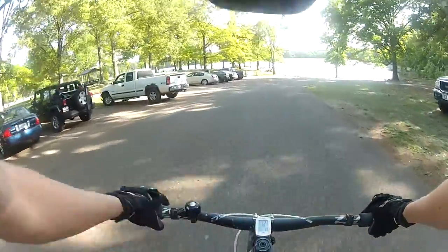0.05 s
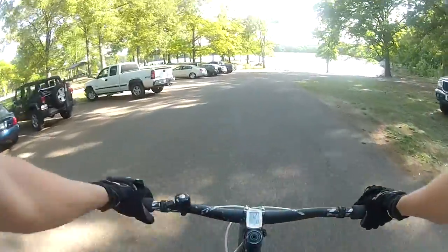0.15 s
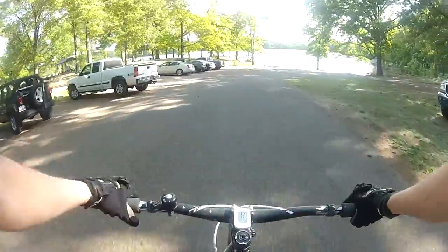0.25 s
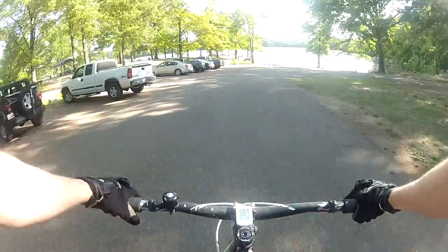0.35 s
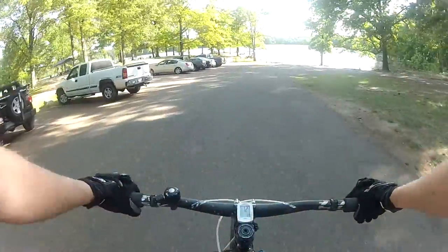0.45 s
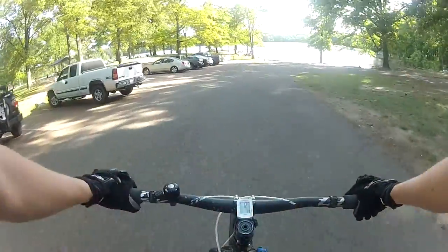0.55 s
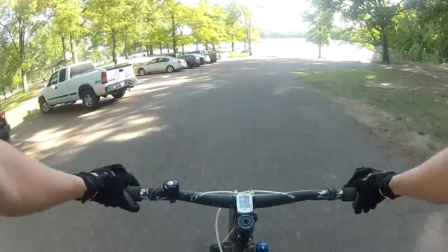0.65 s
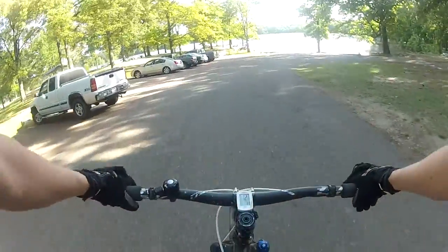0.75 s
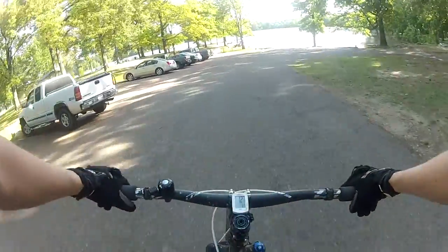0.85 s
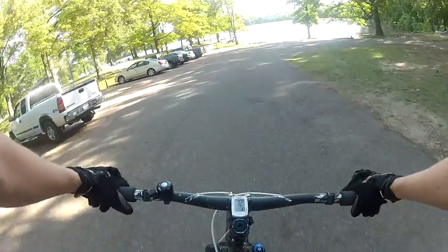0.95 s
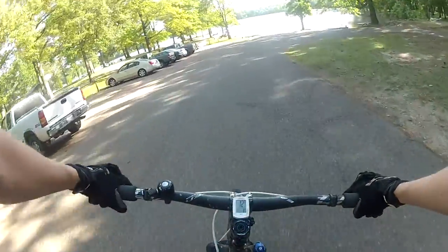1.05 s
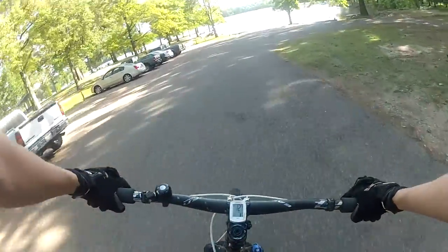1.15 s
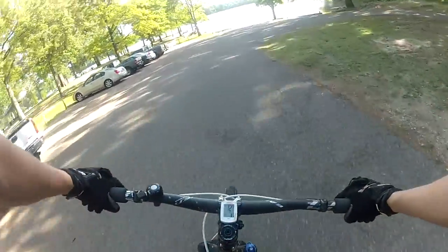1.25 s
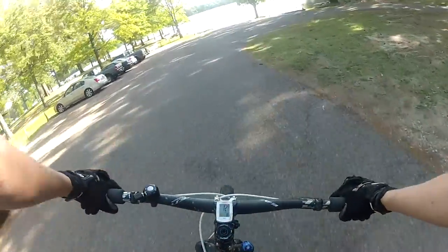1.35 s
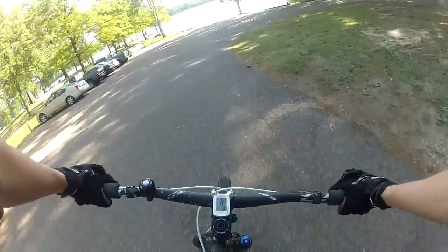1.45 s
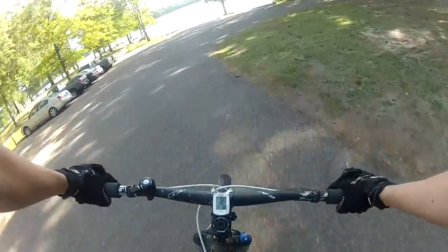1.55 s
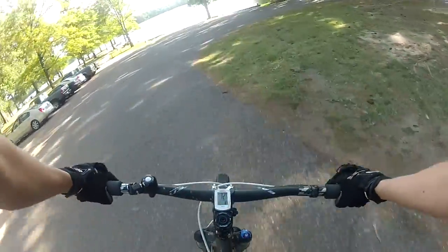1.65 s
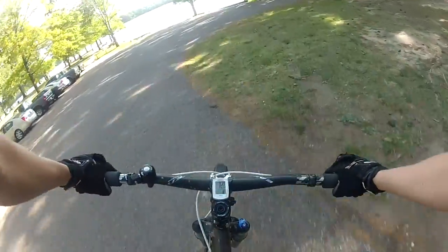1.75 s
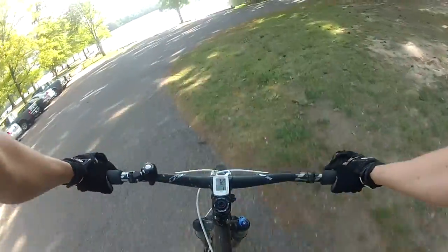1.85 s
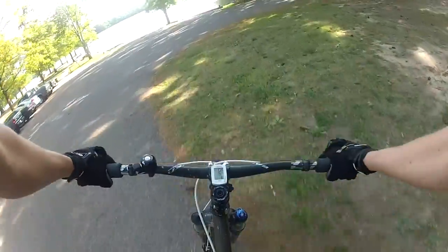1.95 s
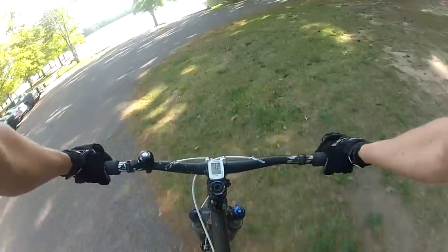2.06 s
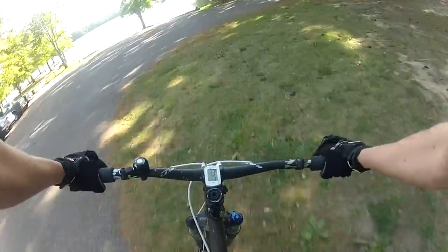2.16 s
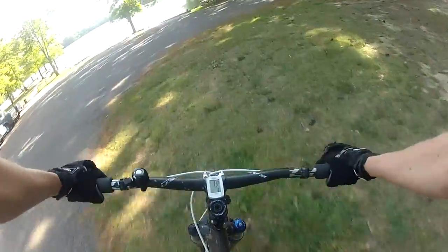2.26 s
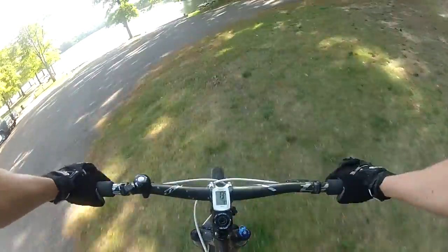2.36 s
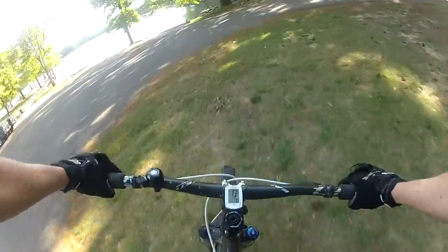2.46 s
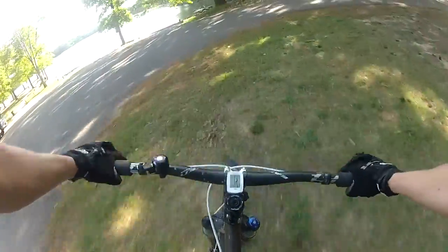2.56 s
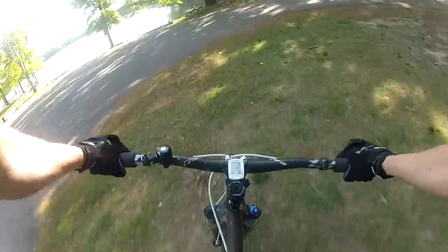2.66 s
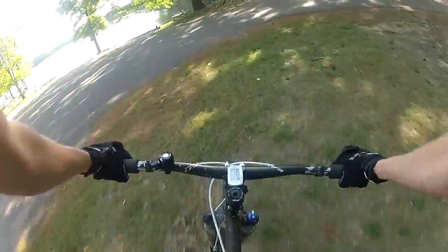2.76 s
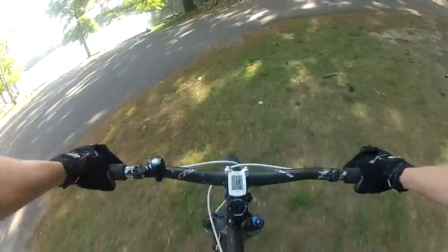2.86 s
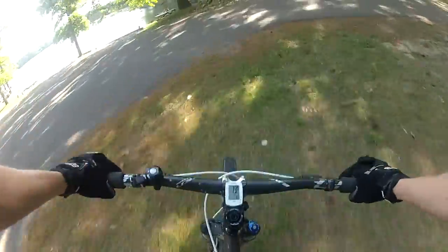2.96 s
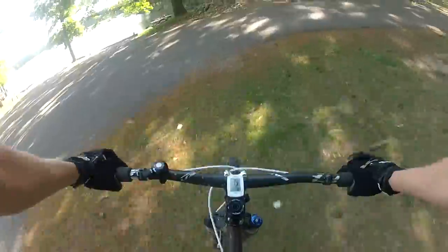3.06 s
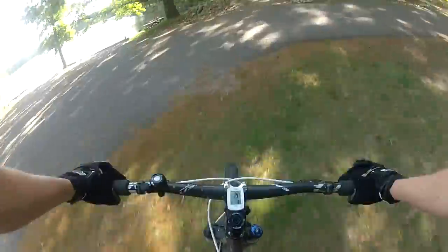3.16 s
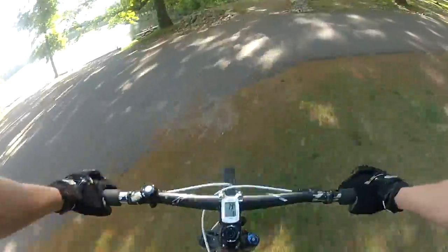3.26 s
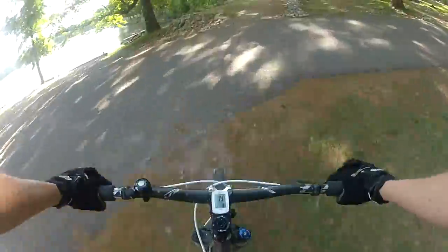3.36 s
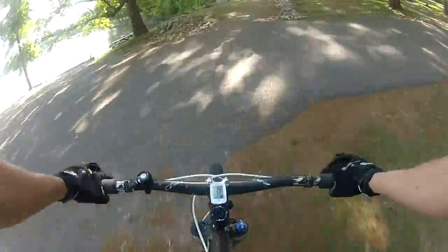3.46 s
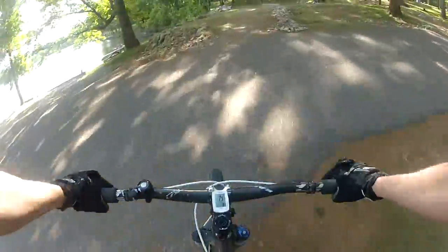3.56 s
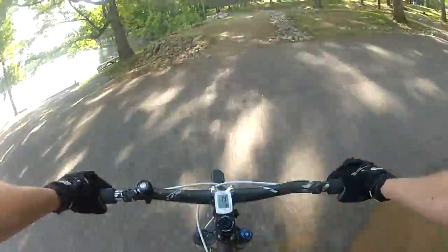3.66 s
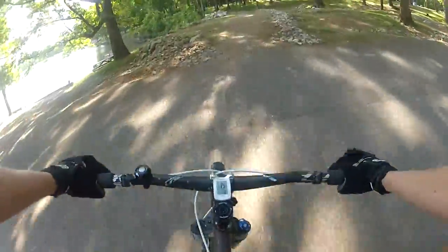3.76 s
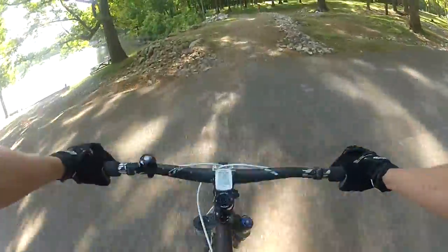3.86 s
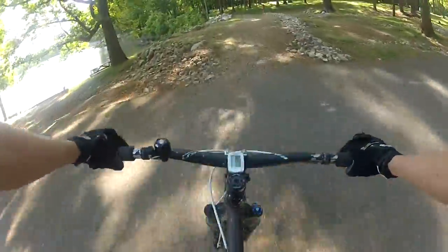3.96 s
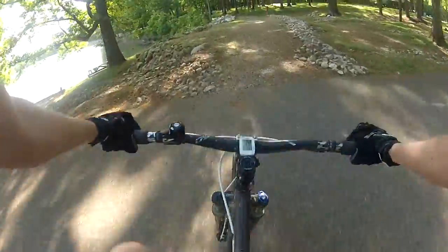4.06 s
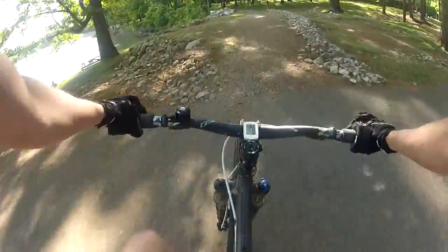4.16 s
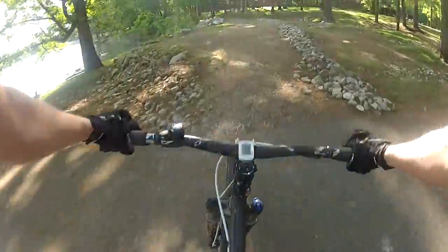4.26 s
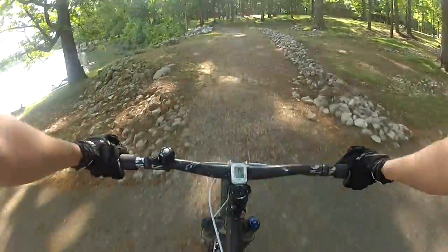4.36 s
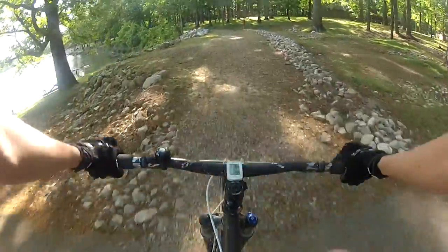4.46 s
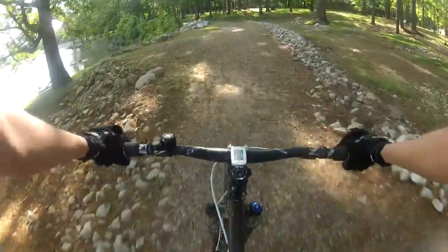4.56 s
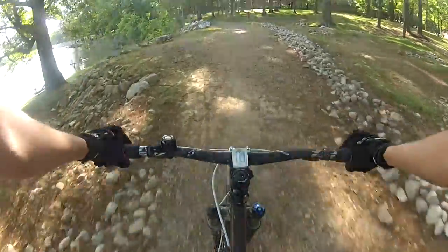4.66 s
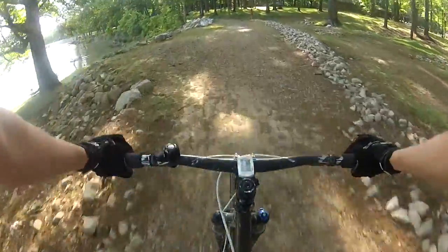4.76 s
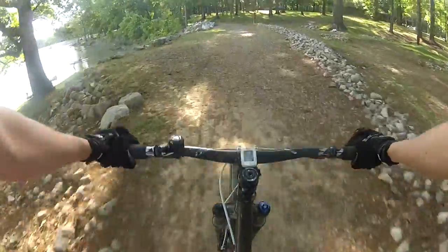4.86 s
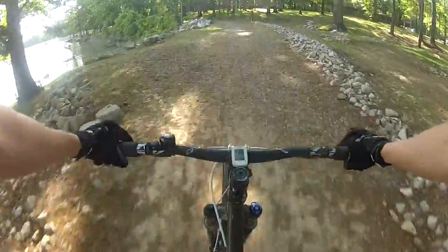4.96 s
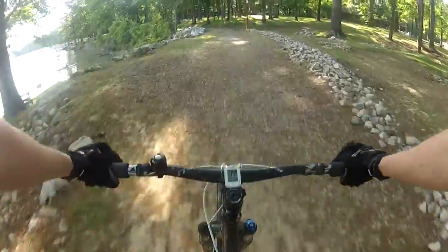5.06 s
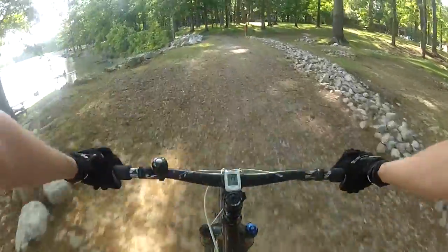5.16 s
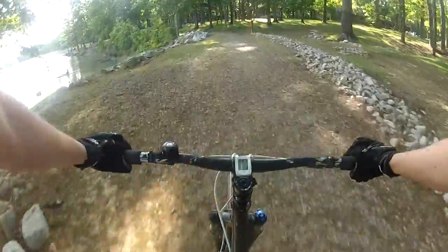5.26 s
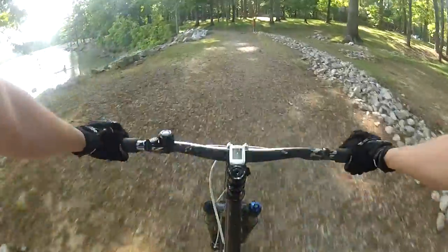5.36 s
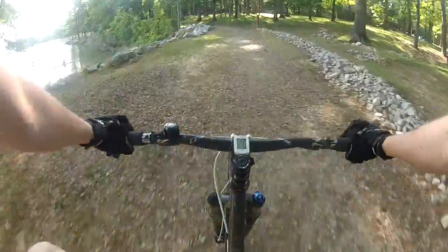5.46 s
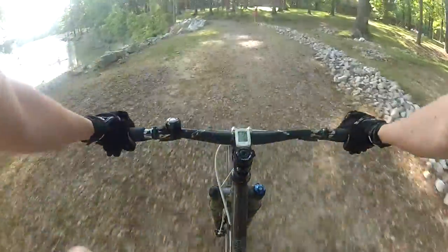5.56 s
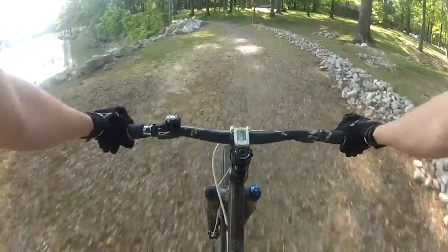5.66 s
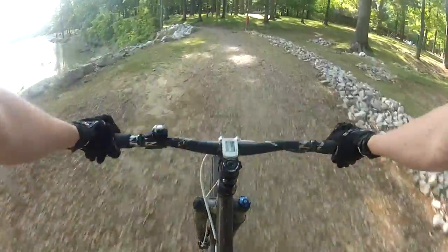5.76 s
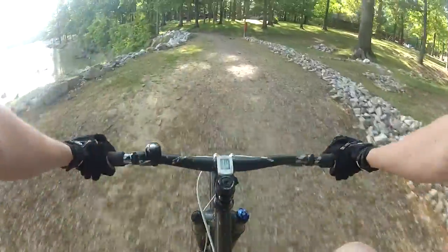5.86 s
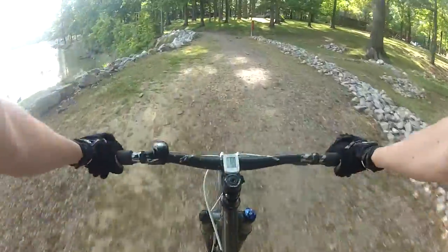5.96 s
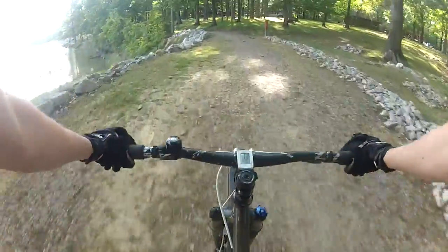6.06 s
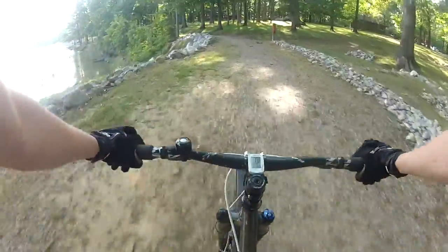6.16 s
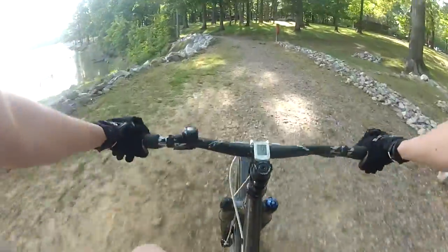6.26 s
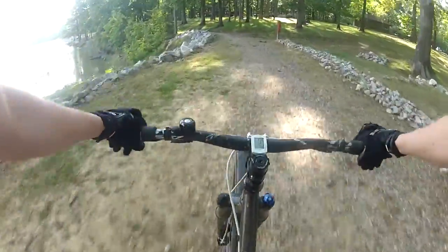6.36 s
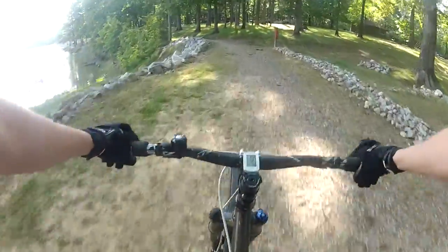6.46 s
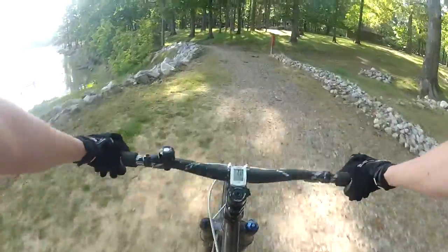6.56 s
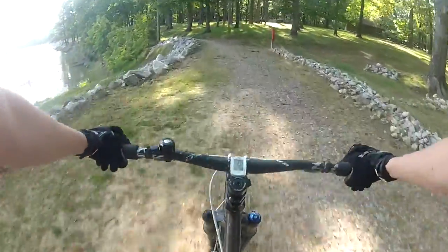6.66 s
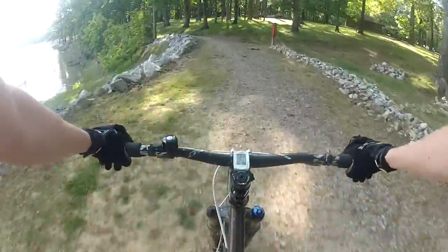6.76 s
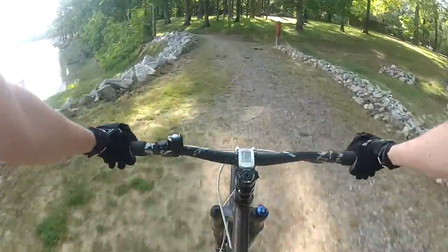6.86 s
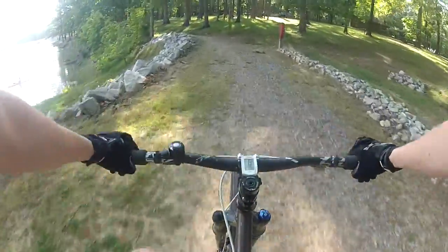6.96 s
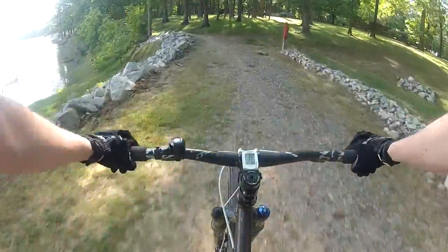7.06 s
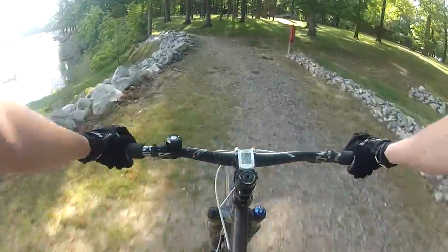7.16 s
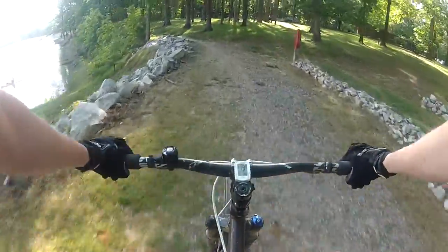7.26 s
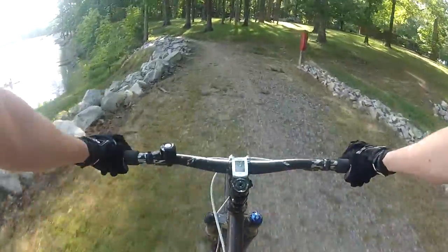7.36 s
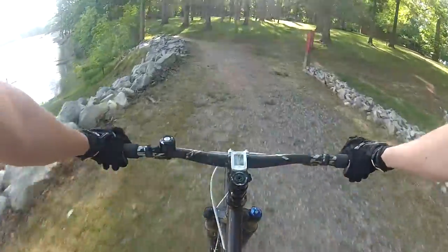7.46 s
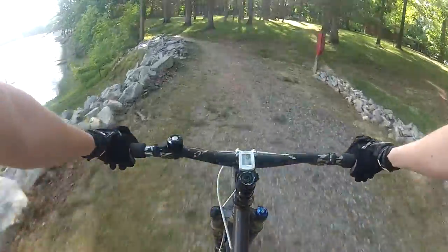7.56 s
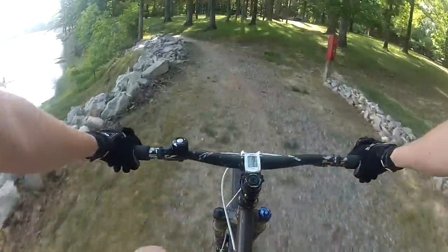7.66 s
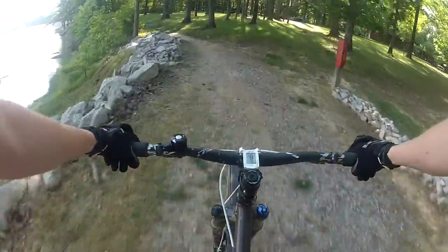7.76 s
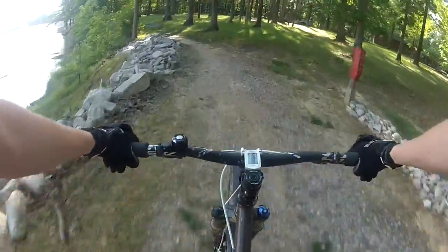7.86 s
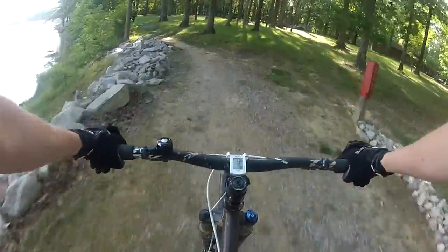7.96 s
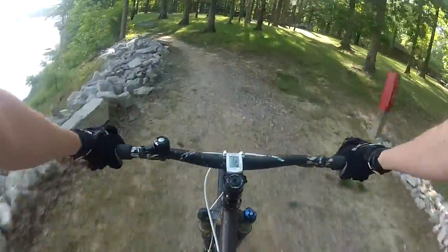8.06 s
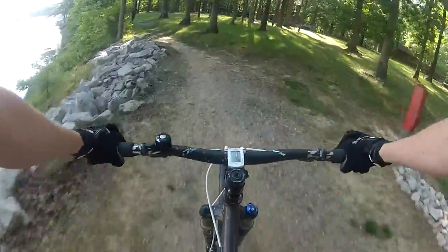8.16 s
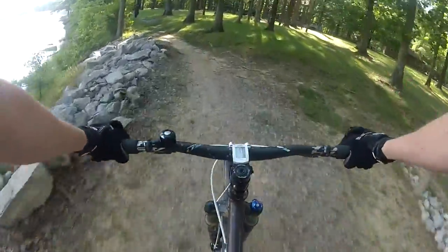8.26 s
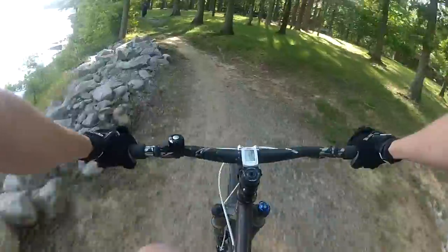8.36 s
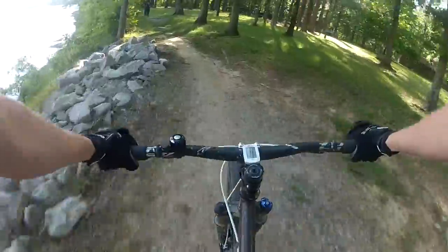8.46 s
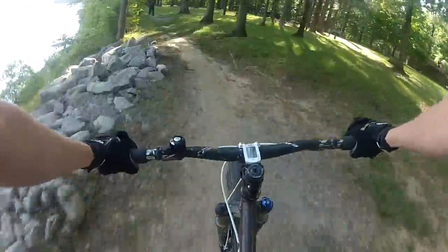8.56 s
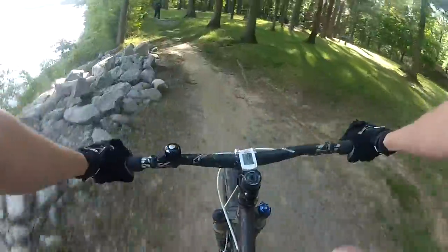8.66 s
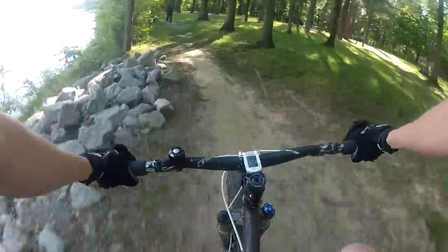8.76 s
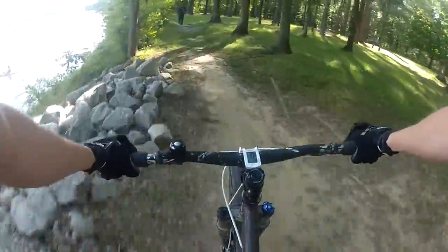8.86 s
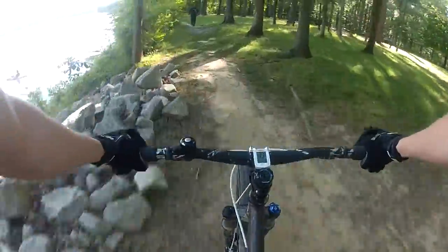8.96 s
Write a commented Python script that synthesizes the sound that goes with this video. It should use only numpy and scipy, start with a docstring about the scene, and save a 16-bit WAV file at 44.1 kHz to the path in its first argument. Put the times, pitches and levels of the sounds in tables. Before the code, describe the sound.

A mountain bike rides outdoors, heard from a camera in a closed case on the rider's chest. Low wind rumble drums on the case throughout. At first knobbly tyres hum softly on asphalt, with a few clicks. The rumble grows louder as the bike crosses grass and more pavement, then grit crackles on a gravel trail, with frequent sharp clicks from loose parts and dull thumps from bumps.

```python
"""A mountain bike rolls from asphalt over grass onto a gravel trail, heard from the rider's chest.
The microphone is in a camera inside a closed case, and wind and jolts drum right on that case.
From the wheels below, knobbly tyres hum on the road, grit crackles, and stones and roots thump;
loose parts click close by. The camera samples at 12 kHz and holds each sample."""
import sys
import numpy as np
from scipy import signal
from scipy.fft import rfft, irfft, next_fast_len
from scipy.io import wavfile
from scipy.ndimage import uniform_filter1d

SR = 44100
rng = np.random.default_rng(int(sys.argv[2]) if len(sys.argv) > 2 else 0)


def wav_out(sig):
    """Save sig, one row per channel (or a flat mono array), as 16-bit PCM at SR to the path in sys.argv[1]."""
    wavfile.write(sys.argv[1], SR, np.round(np.clip(np.atleast_2d(sig).T, -1, 1) * 32767).astype(np.int16))


N = 397782
TIME = np.arange(N) / SR


def undb(db):
    """Gain of a level in dB."""
    return 10 ** (np.asarray(db) / 20)


def unit(x):
    """Scale to rms 1."""
    return x / np.sqrt(np.mean(x ** 2))


def curves(table):
    """Columns of a table joined by straight lines in time."""
    times, *columns = np.transpose(table)
    return [np.interp(TIME, times, column) for column in columns]


def colour(x, points, lo_hz, hi_hz):
    """Shape x by (Hz, dB) points inside a band with soft edges; rms 1."""
    size = next_fast_len(N)
    f = np.arange(1, size // 2 + 2) * SR / size
    hz, db = np.transpose(points)
    shape = undb(np.interp(np.log(f), np.log(hz), db))
    edges = 1 / np.sqrt((1 + (lo_hz / f) ** 8) * (1 + (f / hi_hz) ** 8))
    return unit(irfft(rfft(x, size) * shape * edges, size)[:N])


def band(x, lo_hz, hi_hz):
    """Steep band of x scaled to peak 1."""
    y = signal.sosfilt(signal.butter(3, [lo_hz, hi_hz], "band", fs=SR, output="sos"), x)
    return y / np.abs(y).max()


def wander(rate_hz):
    """Random steps, smoothed twice; rms 1."""
    hold = int(SR / rate_hz)
    steps = np.repeat(rng.standard_normal(N // hold + 1), hold)
    return unit(uniform_filter1d(uniform_filter1d(steps, hold), hold)[:N])


def ring(x, hz, t60):
    """One mode excited by x, dying by 60 dB in t60 seconds."""
    pole = np.exp(2j * np.pi * hz / SR - np.log(1000) / (max(t60, 1e-3) * SR))
    return signal.lfilter([1], [1, -pole], x).imag


def grains(per_s, spread_db):
    """Random impulses, most small and a few larger."""
    chance, size, sign = rng.random((3, N))
    size_db = np.minimum(-spread_db * np.log(1 - size), 11)
    return (chance < per_s / SR) * undb(size_db) * np.sign(sign - .5)


# The route: asphalt, grass, asphalt, gravel. Each row: start in seconds, drone in dB above the
# drumming, grains in dB above the hiss, faint clicks per second, their level in dB.
SURFACES = [(0, -4.5, -6, 6.8, -34), (2.25, -12, -2.5, 10, -32.5), (3.05, -10, -4, 10, -30),
            (4.5, -8.5, -2.5, 26, -29)]


def ground(blend_s=0.12):
    """The four settings of the surface under the wheels, each blending into the next."""
    starts, *columns = np.transpose(SURFACES)
    surface = np.searchsorted(starts, TIME, "right") - 1
    return [uniform_filter1d(c[surface], int(blend_s * SR), mode="nearest") for c in columns]


# Wind and ground shaking the case, right at the microphone, harder over bumps.
# Each row: time in seconds, drumming in dB, wind thud in dB above the drumming.
SHAKING = [(0.0, -30.5, -8), (0.12, -32, -3.5), (1.98, -29, -9.5), (2.13, -34, -2), (2.18, -25.5, -13),
           (2.28, -26, -4), (2.36, -21.5, -3), (2.66, -20.5, -10), (3.06, -21, -9), (3.16, -16, -7),
           (3.62, -20, -10), (3.67, -27, -8), (3.79, -19.5, -15), (3.82, -17, -15), (3.87, -17, -5),
           (4.12, -22, -12), (4.22, -12.5, -11), (4.27, -18.5, -1), (4.32, -15, -7.5), (4.5, -19, -11),
           (4.52, -25, 0), (4.55, -19.5, -7), (4.82, -15, -10), (4.97, -22.5, -5), (5.05, -15.5, -3),
           (5.57, -18.5, -8), (5.88, -16, -8.5), (6.03, -19.5, -8), (6.61, -14, -10), (6.66, -17, -6),
           (6.81, -13.5, -14), (6.91, -20.5, -3), (7.21, -15, -17), (7.26, -16, -5), (7.54, -22.5, -9),
           (7.61, -15.5, -6.5), (8.44, -19.5, -4.5), (8.54, -20, -8), (8.57, -15.5, -8), (8.82, -17, -6),
           (8.97, -15.5, -20), (9.02, -17, -15)]
# Its tone from inside the case. Each row: frequency in Hz, relative level in dB.
RUMBLE_SPECTRUM = [(12, -61), (20, -13), (102, -1.5), (242, -3), (464, -10.5), (507, -14), (576, -11.5),
                   (1030, -35), (1500, -44.5), (1950, -61), (3300, -120)]


def buffeting():
    """Wind and ground drum on the case in three bands that swell and flutter together."""
    drum_db, thud_db = curves(SHAKING)
    drone_db = ground()[0] + 1.78 * wander(40)
    push = rng.standard_normal((3, N))
    flutter = wander(30)
    thud = colour(push[0], RUMBLE_SPECTRUM, 12, 86) * undb(drum_db + thud_db + 0.35 * flutter)
    drum = colour(push[1], RUMBLE_SPECTRUM, 73, 317) * undb(drum_db + 1.5 * flutter)
    drone = colour(push[2], RUMBLE_SPECTRUM, 345, 1340) * undb(drum_db + drone_db + 0.98 * flutter)
    return thud + drum + drone


# Knobbly tyres on smooth road, heard from chest height.
# Each row: pitch in Hz, bandwidth in Hz, level in dB.
TREAD_BANDS = [(71.9, 1.8, -35.5), (255.4, 20, -38), (575.6, 18, -41), (765, 59, -44.5), (2780, 170, -65)]


def tread_hum(end_s=2.31, fade_s=0.25):
    """Tread blocks hum in a few narrow bands until the first stretch of asphalt ends."""
    on_road = np.clip((end_s - TIME) / fade_s, 0, 1)
    hum = sum(undb(db) * unit(ring(rng.standard_normal(N), hz, t60=np.log(1000) / (np.pi * width)))
              for hz, width, db in TREAD_BANDS)
    return hum * on_road


# Grit under the tyres, below the microphone.
# Each row: time in seconds, hiss in dB, bright swish in dB.
GRIT_LEVELS = [(0.0, -45.5, -55), (0.45, -45.5, -54.5), (0.75, -44.5, -55.5), (1.96, -42.5, -51.5),
               (2.66, -48, -52.5), (3.04, -44.5, -46), (4.17, -44.5, -55), (4.45, -47, -56),
               (4.82, -40.5, -56), (5.1, -44, -52), (5.33, -42, -51), (5.62, -36, -59.5),
               (7.06, -43.5, -53), (8.16, -40, -56.5), (8.49, -38, -54), (9.02, -40, -51)]
# Its tone from inside the case. Each row: frequency in Hz, relative level in dB.
GRIT_SPECTRUM = [(530, 10.5), (900, -1.5), (1090, -14.5), (1580, -9), (2140, -8.5), (2390, -8), (2820, -6),
                 (3640, -15.5), (4620, -19.5), (5120, -21.5), (6000, -33), (7800, -81), (13200, -120)]
# Modes of the case around the microphone.
# Each row: pitch in Hz, relative level in dB, ring time in seconds.
CASE_MODES = [(2086, -2, 0.0072), (2774, -0.5, 0.0064), (1200, -1.5, 0.0069), (4440, -4.5, 0.0034)]


def tyre_grit():
    """Rolling hiss and sand grains in two bands, and a dense patter of stones that rings the case."""
    hiss_db, swish_db = curves(GRIT_LEVELS) + crunch_rise()
    grain_db = ground()[1]
    sand = unit(grains(per_s=900, spread_db=2.9)) * undb(grain_db)
    rolling = rng.standard_normal(N) * undb(0.59 * wander(25) + 3.4 * wander(80))
    flicker_db = 0.5 * wander(14)
    hiss = colour(rolling + sand, GRIT_SPECTRUM, 560, 3750) * undb(hiss_db + flicker_db)
    swish = colour(rolling + sand, GRIT_SPECTRUM, 3900, 7400) * undb(swish_db + flicker_db)
    stones = sum(undb(db) * unit(ring(grains(per_s=150, spread_db=1.7), hz, t60))
                 for hz, db, t60 in CASE_MODES)
    return hiss + swish + undb(hiss_db + grain_db - 5) * stones


def faint_clicks(slot_s=0.02):
    """Small clicks at chance moments, at most one a slot, more of them on gravel."""
    slots = np.arange(0, N, int(slot_s * SR))
    per_s, level_db = (column[slots] for column in ground()[2:])
    chance, late, pitch, share = rng.random((4, len(slots)))
    size, crack, knock = rng.standard_normal((3, len(slots)))
    starts = slots / SR + late * slot_s
    hz = np.interp(pitch, [0, 1], [1870, 3100])
    crack_db, knock_db = -20 + 4 * crack, -15 + 4 * knock
    rows = np.transpose([starts, level_db + 2.5 * size, hz, share, crack_db, knock_db])
    return clicks(rows[chance < per_s * slot_s])


# Loose parts near the microphone. Each row: start in seconds, level in dB, centre pitch in Hz,
# pitched share from 0 to 1, bright crack and low knock in dB above that level.
LOUD_CLICKS = [(0.6128, -19, 2220, 0.37, -18, -14), (0.8145, -25.5, 2250, 0.4, -11, -20),
               (0.998, -23, 1950, 0.3, -19, -10), (1.0884, -23, 3090, 0.45, -16, -12),
               (1.418, -20, 2250, 0.28, -7, -15), (1.6048, -26, 2970, 0.6, -5, -3),
               (1.7684, -24, 2960, 0.5, -21, -8), (1.8235, -20.5, 2900, 0.45, -15, -15),
               (1.8756, -25, 2180, 0.45, -20, 3.5), (2.3603, -15, 2540, 0.6, -36, -1.5),
               (2.73, -24.5, 2220, 0.5, -13, -12), (2.8769, -21, 2050, 0.45, -20, -1),
               (2.9854, -28, 2290, 0.45, -20, -9), (3.07, -24.5, 2850, 0.5, -20, -14),
               (3.1368, -19.5, 2160, 0.45, -22, -2), (3.2121, -23, 2870, 0.6, -19, -17),
               (3.2822, -16, 2860, 0.57, -20, -14), (3.3455, -25.5, 2910, 0.45, -20, -10),
               (3.542, -19, 2240, 0.56, -25, -4), (3.5877, -22, 2240, 0.4, -21, -7),
               (3.7276, -25, 2850, 0.45, -20, -8), (3.8564, -24.5, 2130, 0.2, -12, -6),
               (4.1666, -12.5, 2500, 0.62, -11, -14), (4.3618, -23, 2290, 0.2, -21, -8),
               (4.4882, -20, 3400, 0.45, -15, -13), (4.557, -24.5, 2550, 0.4, -10, -3),
               (4.6059, -30, 2190, 0.4, 6, -10), (4.661, -23.5, 2240, 0.45, -17, -4),
               (4.691, -20, 2320, 0.5, -20, -14), (4.7386, -16, 2160, 0.4, -22, -5),
               (4.8737, -15, 2140, 0.5, -27, -3), (4.8983, -19, 2390, 0.45, -19, -13),
               (4.9921, -20, 2020, 0.45, -22, -11), (5.0843, -23, 2905, 0.45, -20, -14),
               (5.437, -21, 2830, 0.6, -21, -14), (5.4755, -17, 2260, 0.4, -21, -16),
               (5.5612, -23, 2300, 0.45, -16, -8), (5.5997, -16, 2770, 0.5, -23, -16),
               (5.633, -16, 2000, 0.45, -22, -13), (5.7193, -29, 2820, 0.45, -21, -11),
               (5.7343, -14, 1940, 0.5, -31, -11), (5.7594, -28, 2000, 0.45, -12, -7),
               (5.7808, -22.5, 1744, 0.5, -5, -1), (5.8325, -18, 1840, 0.4, -23, -2.5),
               (5.9086, -23, 1800, 0.45, 1, -3), (5.9334, -19.5, 1730, 0.45, -11, -2),
               (5.9832, -25.5, 2150, 0.5, -23, 3), (6.0319, -18.5, 2070, 0.4, -20, -2.5),
               (6.1545, -17, 2220, 0.3, -13, -22), (6.4243, -16, 2720, 0.4, -9, -8),
               (6.4445, -15.5, 2030, 0.45, -6, -14), (6.4797, -11, 1900, 0.54, -31, -10),
               (6.495, -15, 1940, 0.6, -23, -17), (6.508, -21.5, 3120, 0.45, 0.5, -16),
               (6.5858, -15, 2180, 0.33, -17, -12), (6.6116, -22.5, 2820, 0.45, 5, -6),
               (6.6356, -3, 2210, 0.34, -16, -27), (6.6608, -25, 2590, 0.45, -14, -8),
               (6.7602, -22, 2420, 0.45, -17, -8), (7.073, -16.5, 2360, 0.5, -12, -7),
               (7.1084, -19, 1730, 0.45, -19, 2), (7.1138, -18, 2270, 0.45, -18, -7),
               (7.2705, -24, 2520, 0.3, -7, 0), (7.317, -25, 1850, 0.45, -18, -11),
               (7.4492, -18.5, 2560, 0.45, -23, -15), (7.7558, -21.5, 2670, 0.45, -22, -2),
               (7.8994, -21, 2600, 0.45, -18, -7), (7.9336, -22, 2220, 0.6, -28, -13),
               (7.9763, -20, 2110, 0.4, -16, -10), (7.9957, -15.5, 1980, 0.5, -30, -7),
               (8.0365, -21, 1730, 0.36, -13, 0), (8.2514, -22, 2440, 0.5, -18, -5),
               (8.2885, -23, 2030, 0.45, -20, -5), (8.314, -21, 2680, 0.45, -17, -2),
               (8.371, -17, 2520, 0.4, -13, -13), (8.3833, -17.5, 2470, 0.45, -14, -9),
               (8.4188, -14, 2270, 0.45, -18, -3), (8.4417, -12, 2280, 0.45, -21, -15),
               (8.4692, -16, 2410, 0.45, -24, -3), (8.5639, -15.5, 2650, 0.45, -22, -21),
               (8.6896, -22, 1950, 0.45, -27, -14), (8.7133, -23, 2930, 0.5, -21, -13),
               (8.737, -9.5, 2340, 0.33, -28, -25), (8.7989, -19, 2060, 0.4, -19.5, -9),
               (8.876, -4.5, 1820, 0.2, -27, -28), (8.888, -22, 1960, 0.4, -24, -14),
               (8.9444, -20.5, 2750, 0.45, -11, -5), (8.969, -25, 2690, 0.45, -16, -10),
               (8.9979, -19, 2000, 0.45, -23, -17)]


def clicks(rows, t60=0.015, edge_ratio=1.145):
    """Loose parts strike: a dry, loosely pitched burst, a crack, a knock and a rattle of the case."""
    out, t = np.zeros(N + SR), np.arange(SR // 30) / SR
    lowpass = signal.butter(4, 3660, fs=SR, output="sos")
    for start_s, db, hz, share, crack_db, knock_db in rows:
        burst_noise, contact_noise = rng.standard_normal((2, len(t)))
        burst = burst_noise * np.exp(-t * np.log(1000) / t60)
        snap = np.sign(contact_noise) * np.exp(-t / 0.00052)  # first contact, always brief
        pitched = share * band(burst, hz / edge_ratio, hz * edge_ratio)
        broad = (1 - share) * band(burst + snap, 1060, 4200)
        tap = contact_noise * np.exp(-t / 0.002)
        case = sum(undb(mode_db) * ring(tap, mode_hz, ring_s) for mode_hz, mode_db, ring_s in CASE_MODES)
        rattle = 0.31 * case / np.abs(case).max()
        body = signal.sosfilt(lowpass, pitched + broad + rattle)
        crack = undb(crack_db) * band(snap + .4 * burst, 3500, 5600)
        knock = undb(knock_db) * band(burst + snap, 600, 1070)
        at = int(start_s * SR)
        out[at:at + len(t)] += undb(db) * (body + crack + knock)
    return out[:N]


# Loose stones or dry grass down at the tyres.
# Each row: centre in seconds, length in seconds, hiss rise in dB, swish rise in dB.
CRUNCH_PATCHES = [(2.838, 0.17, 3.5, 7), (3.157, 0.056, 3, 1), (3.576, 0.067, 9, -13),
                  (3.737, 0.069, 6.5, -2), (4.645, 0.26, 6, 0), (4.75, 0.044, 5.5, 3),
                  (4.918, 0.11, 5.5, 7), (5.477, 0.083, 1.5, 8), (6.458, 0.058, 8.5, -3), (6.6, .06, 4, 3),
                  (7.1, 0.076, 4.5, 1), (7.448, 0.22, 3, 0), (8, 0.12, 3, -1), (8.413, 0.052, 0.5, -2),
                  (8.76, 0.12, 3.5, 2), (8.887, 0.05, 4.5, -4)]


def crunch_rise():
    """Each patch crunches briefly under the tyre: a smooth hump, in dB, on the hiss and swish."""
    return sum(np.outer(rise_db, np.exp(-.5 * (2 * (TIME - centre_s) / length_s) ** 2))
               for centre_s, length_s, *rise_db in CRUNCH_PATCHES)


# Stones and roots under the wheel, as they reach the chest.
# Each row: start in seconds, level in dB, pitch in Hz.
BUMPS = [(2.875, -19, 457), (3.148, -12, 457), (3.543, -16.5, 636), (3.993, -12.5, 442),
         (4.642, -13.5, 470), (4.794, -28, 495), (5.375, -26, 410), (5.53, -8.5, 490), (5.933, -9, 440),
         (6.151, -11, 444), (6.276, -17, 460), (6.476, -11, 407), (6.56, -8, 590), (7.073, -11.5, 680),
         (7.655, -18, 575), (7.71, -14, 423), (7.979, -4.5, 570), (8.561, -11, 560), (8.693, -5, 390)]


def jolts():
    """Each bump sends a dull thump of two or three cycles through frame and body."""
    out, t = np.zeros(N + SR), np.arange(SR // 25) / SR
    for start_s, db, hz in BUMPS:
        at = int(start_s * SR)
        out[at:at + len(t)] += undb(db) * np.sin(2 * np.pi * hz * t) * np.exp(-t * hz / 2)
    return out[:N]


def scene():
    """All sources at the one microphone on the rider's chest."""
    return (buffeting() + tread_hum() + tyre_grit() + faint_clicks() + clicks(LOUD_CLICKS) + jolts())[None]


def record(dry, sample_hz=12000, store_hz=48000):
    """The camera overloads softly, samples slowly, holds each sample and cuts the top in two steps."""
    overloaded = np.tanh(0.62 * dry) / 0.57
    dulled = signal.sosfilt(signal.butter(2, 5200, fs=SR, output="sos"), overloaded)
    sampled = signal.resample_poly(dulled, sample_hz, SR, axis=1)
    held = np.repeat(sampled, store_hz // sample_hz, axis=1)  # adds mirror bands round 12 kHz
    stored = signal.resample_poly(held, SR, store_hz, axis=1)[:, :N]
    top_fade = signal.ellip(7, .5, 20, 15300, fs=SR, output="sos")
    top_cut = signal.ellip(10, .2, 70, 16489, fs=SR, output="sos")
    return signal.sosfilt(top_cut, signal.sosfilt(top_fade, stored))


dry = scene()
out = record(dry)
wav_out(out)
```